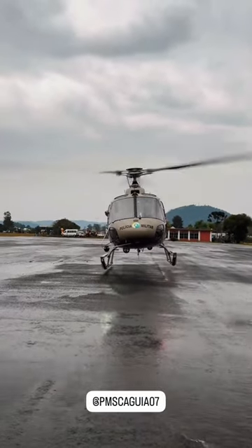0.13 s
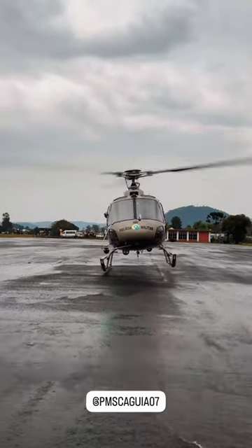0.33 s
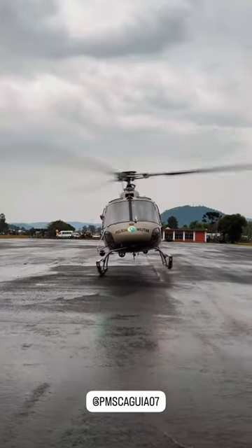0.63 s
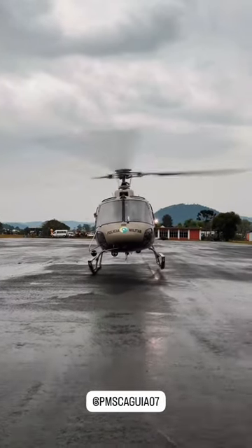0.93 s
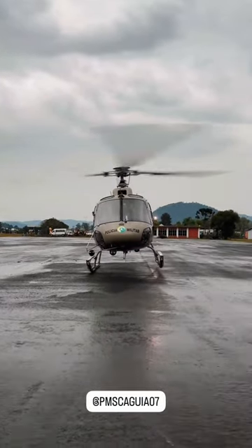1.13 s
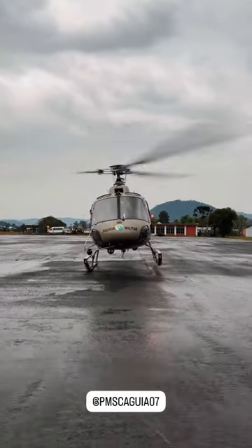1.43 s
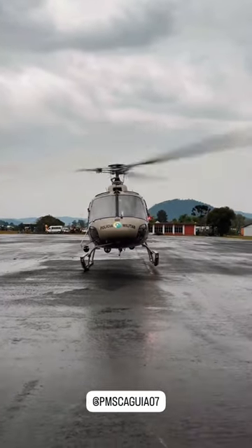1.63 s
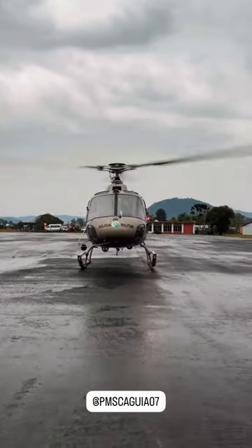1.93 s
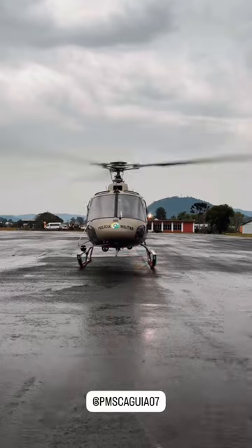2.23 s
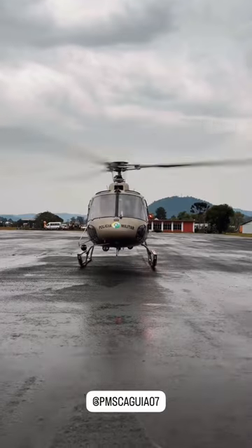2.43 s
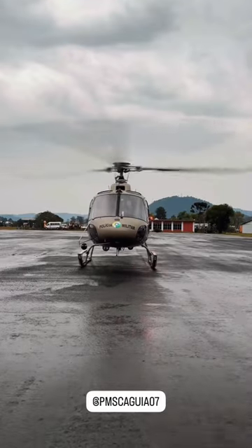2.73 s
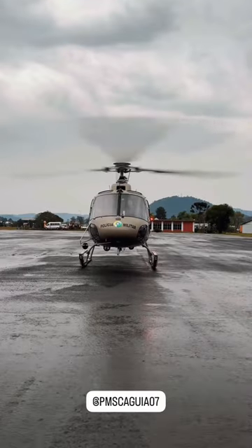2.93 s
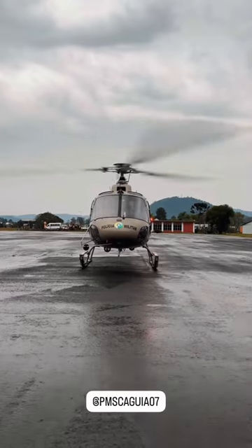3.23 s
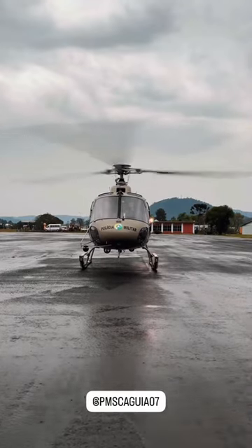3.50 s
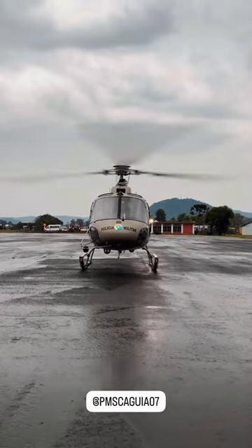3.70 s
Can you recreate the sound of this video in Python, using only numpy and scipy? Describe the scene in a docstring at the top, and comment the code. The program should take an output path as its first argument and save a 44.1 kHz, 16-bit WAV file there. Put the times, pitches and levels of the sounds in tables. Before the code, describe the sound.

Close helicopter settling onto wet tarmac: fast blade slaps, turbine roar and whine, early downwash gusts.

```python
"""Light helicopter landing, heard by a phone.

A light helicopter settles onto wet tarmac, facing a phone with two microphone ports. Main blades slap (gliding
pulses) and swish (noise swelled once a pass); the tail rotor hums (harmonics); the turbine roars and whines
(shaped noise, resonances), with a growl and one hiss. Downwash buffets the ports in gusts and sharp flaps."""
import sys
import numpy as np
from scipy import signal
from scipy.fft import rfft, irfft
from scipy.io import wavfile
from scipy.ndimage import uniform_filter1d, minimum_filter1d

SR = 44100
rng = np.random.default_rng(int(sys.argv[2]) if len(sys.argv) > 2 else 0)


def wav_record(signal):
    """Record a signal, one row per channel, as 16-bit PCM in the file named by sys.argv[1]."""
    frames = np.transpose(np.atleast_2d(signal))
    bounded = np.clip(frames, -1, 1)
    # unit amplitude maps onto the largest positive 16-bit level
    quanta = np.round(bounded * 32767).astype(np.int16)
    wavfile.write(sys.argv[1], SR, quanta)


def ratio(d):
    """dB to gain"""
    e = np.asarray(d, float) / 20
    return 10 ** e


N = 170226
T = np.arange(N) / SR

# Downwash gusts on the ports: start_s, length_s, rush_db, thump_db
GUSTS = [(0, 0.049, -9.5, -9), (0.031, 0.063, -21, -12.5), (0.178, 0.086, -13, -12.5),
         (0.274, 0.068, -17.5, -15), (0.339, 0.066, -15, -12), (0.4, 0.1, -15.5, -9.5),
         (0.485, 0.11, -27.5, -24.5), (0.738, 0.044, -28, -18), (0.827, 0.084, -35, -37),
         (0.92, 0.13, -25.5, -26), (0.996, 0.094, -16.5, -13.5), (1.115, 0.048, -19, -19),
         (1.202, 0.063, -20, -18.5), (1.243, 0.11, -32, -31), (1.453, 0.048, -22.5, -21),
         (1.501, 0.032, -24, -29), (1.672, 0.078, -30, -24.5), (1.819, 0.1, -26.5, -21),
         (1.947, 0.08, -24, -25), (2.095, 0.05, -34, -28), (2.167, 0.084, -46, -22.5),
         (2.259, 0.081, -19.5, -19), (2.35, 0.031, -37, -16), (2.466, 0.097, -31.5, -39),
         (2.739, 0.091, -26, -48), (2.817, 0.037, -23, -20), (2.993, 0.11, -39, -38),
         (3.12, 0.065, -22, -33), (3.171, 0.05, -21.5, -14.5), (3.235, 0.089, -25.5, -50),
         (3.5, 0.13, -37, -29.5), (3.67, 0.078, -29, -36), (3.764, 0.041, -40, -40)]
# Rush spectrum, differs between ports: freq_hz, density_db
RUSH_SPECTRUM = [(60, 0), (150, 1), (400, 0), (800, -2), (1400, -7.5), (2200, -23), (4000, -25),
                 (6500, -88)]
# Thump spectrum, shared by both ports: freq_hz, density_db
THUMP_SPECTRUM = [(20, -45), (33, -19), (50, 5), (70, 0.5), (130, -4), (300, -11), (800, -30.5),
                  (2000, -31), (4000, -59), (6500, -106)]
GUST_EDGE_S, BREEZE_RUSH_DB, BREEZE_THUMP_DB = 0.037, -47, -46.5
RUSH_LUMPY_DB, THUMP_LUMPY_DB, RUSH_LIKENESS = 2.5, 1, -0.6

# Sharp flaps of wind: time_s, level_before_trim_db, centre_hz
FLAPS = [(0.192, -4, 820), (0.196, -7, 1470), (0.218, -20, 1400), (0.227, -7, 1650), (.282, -12, 325),
         (.315, -9.5, 1690), (0.384, -13, 795), (0.419, -8, 804), (.428, -6, 1510), (0.442, -4.5, 1010),
         (1.022, -11.5, 346), (1.062, -5.5, 970), (1.07, -10, 446), (1.675, -14.5, 496), (2.279, -9, 920),
         (2.297, -7.5, 1210), (2.533, -13.5, 430), (2.768, -25, 505), (3.803, -12, 640)]
FLAP_CYCLES, FLAP_TRIM_DB = 1.286, -3.5

# Hiss above the whine; the spread is centre to 1/e
HISS_CENTRE_S, HISS_SPREAD_S, HISS_HZ, HISS_WIDTH_HZ, HISS_DB = 3.03, 0.1, 10050, 630, -36

# Growl: time_s, centre_hz, level_before_roughness_db
GROWL = [(0, 560, -33.5), (.9, 548, -34.5), (1.06, 930, -71), (1.2, 620, -39), (2.2, 547, -37),
         (2.5, 445, -37), (2.8, 560, -42.5), (3.0, 600, -31.5), (3.14, 665, -30.5), (3.3, 596, -34.5),
         (3.55, 465, -42.5), (3.72, 480, -30), (3.86, 430, -29)]
GROWL_WIDTH_HZ, GROWL_ROUGH_DB = 270, 5

# Turbine whine, smeared part: time_s, centre_hz, level_before_trim_db
WHINE_SMEAR = [(0.0, 8340, -44), (0.01, 9000, -66), (0.43, 8740, -36.5), (0.64, 9070, -43),
               (0.79, 8790, -22.5), (0.81, 9000, -34), (1.13, 9000, -36), (1.15, 9000, -26),
               (1.19, 8940, -41), (1.55, 9000, -48), (1.57, 8900, -28), (1.59, 8900, -35.5),
               (1.85, 8980, -35), (1.9, 8700, -19.5), (1.92, 8994, -36), (2.19, 8800, -46),
               (2.22, 8900, -33), (2.27, 8900, -39.5), (2.84, 8880, -35.5), (2.85, 8850, -22),
               (2.87, 8800, -37), (2.95, 8700, -33.5), (3.48, 8380, -36.5), (3.5, 8500, -27),
               (3.53, 8320, -32), (3.86, 8370, -41)]
# Turbine whine, thin tone: time_s, centre_hz, level_db
WHINE_CORE = [(0, 8820, -56), (.6, 8820, -48), (.75, 8820, -43), (1.3, 8815, -51), (1.75, 8815, -44),
              (2.05, 8790, -49), (2.45, 8750, -45), (2.7, 8730, -52), (2.95, 8660, -44), (3.25, 8560, -45),
              (3.5, 8450, -44), (3.65, 8380, -41), (3.86, 8300, -49)]
SMEAR_WIDTH_HZ, CORE_WIDTH_HZ, SMEAR_FLUTTER_DB, SMEAR_TRIM_DB = 300, 16, 4, -4.5

# Tail rotor: time_s, blade_pass_hz, level_db, lift_above_third_order_db
TAIL = [(0, 69, -30, 0), (1.0, 68.75, -49, -5), (1.6, 68.7, -38, 1), (2.1, 68.63, -35, 0),
        (2.4, 68.62, -36, 1), (2.55, 69.2, -32.5, -16), (2.8, 68.54, -24.5, -12), (3.0, 68.94, -26.5, -3),
        (3.15, 68.9, -29.5, -1), (3.3, 68.74, -36.5, 0), (3.45, 68.66, -35.5, 1), (3.6, 68.9, -28.5, -5.5),
        (3.75, 69.4, -34.5, 9.5), (3.86, 69.9, -30.5, 1)]
# Tail rotor harmonics: order, relative_level_db
TAIL_ORDERS = [(1, -9), (2, -10), (3, 0), (4, -6), (5, -16), (6, -12), (7, -15), (8, -11), (9, -12),
               (10, -15), (13, -17), (15, -18), (22, -20), (25, -23)]
TAIL_WAVER_DB = 1.3

# Main rotor: time_s, blade_pass_hz
ROTOR = [(0, 19.42), (2.0, 19.42), (3.86, 19.5)]
FIRST_PASS_S = .0005
# Spectrum of engine and blade turbulence: freq_hz, density_db
ROAR_SPECTRUM = [(30, -15), (60, 6.5), (120, 1), (250, -1), (600, -7), (1200, -9.5), (2500, -14),
                 (3600, -18.5), (5500, -20.5), (6500, -17.5), (7600, -18.5), (10000, -16.5), (10900, -16.5),
                 (11400, -19.5), (13500, -18.5), (15200, -16.5), (15600, -20), (15900, -62)]
# Roar level: time_s, level_before_swell_db
ROAR_LEVEL = [(0, -27.5), (.5, -26.5), (.8, -26), (1.1, -25), (1.5, -27), (2.0, -26.5), (2.5, -27),
              (3.0, -26), (3.4, -27), (3.86, -26.5)]
# Swell of the roar at each blade pass: freq_hz, depth_db
SWISH_DEPTH = [(300, .5), (800, 2.5), (1500, 4), (3000, 5), (5000, 4), (8000, 4), (11000, 5.5), (13500, 7)]
SWISH_RISE_PASSES, SWISH_FALL_PASSES = .1, .33
PATCHY_DB, FLICKER_DB = 2, 1.4

# Main blade slaps: time_s, level_db, centre_hz
SLAPS = [(0.052, -19, 1220), (0.1035, -17.5, 1280), (0.155, -16, 1190), (0.206, -10, 1360),
         (0.2574, -14.5, 1160), (0.3089, -11.5, 1490), (0.3602, -14, 1450), (0.4109, -14, 1160),
         (0.4616, -8.5, 1090), (0.5141, -16.5, 1210), (0.5655, -6, 2050), (0.618, -13.5, 1090),
         (0.6688, -14, 1200), (0.7204, -19.5, 860), (0.771, -19, 1140), (0.821, -20.5, 890),
         (0.876, -14, 1350), (0.9282, -12, 1780), (0.9798, -26, 1480), (1.03, -12, 1340),
         (1.0808, -30, 950), (1.1335, -14.5, 1170), (1.1855, -16.5, 1120), (1.2362, -14, 1260),
         (1.2891, -16, 1180), (1.3405, -13, 1170), (1.3916, -10, 1370), (1.4426, -16.5, 1130),
         (1.493, -14.5, 1230), (1.5458, -11.5, 1070), (1.5971, -15.5, 1000), (1.648, -10.5, 1160),
         (1.6987, -21, 1133), (1.75, -25, 1080), (1.8011, -19.5, 1170), (1.8554, -16.5, 1100),
         (1.906, -16.5, 1050), (1.959, -17, 1210), (2.006, -19, 1790), (2.058, -25, 1020),
         (2.1104, -33, 960), (2.163, -22.5, 1020), (2.216, -16.5, 970), (2.3168, -22, 1070),
         (2.4706, -20, 1040), (2.575, -25, 1290), (2.7286, -25, 1610)]
SLAP_CYCLES, SLAP_GLIDE_PER_CYCLE = 1.3, .24
ECHO_DELAY_S, ECHO_DB, CRACK_DB, CRACK_HZ = .0022, -8, -8, 2500
LEAD_SAMPLES = 55  # slap and flap pulses begin this long before time_s

# Port pair, sound from the front: freq_hz, likeness_0_to_1, right_lead_turns
PORTS = [(100, .9, .02), (600, .8, .07), (1450, .98, .01), (1800, .99, 0), (2300, .55, -.3),
         (3000, .6, -.43), (4000, .25, -.24), (5150, .3, -.13), (5450, 1, -.5), (6050, 1, -.5),
         (6500, .6, -.65), (7200, .45, -.82), (7700, 1, -1), (8600, 1, -1), (9200, .7, -1.15),
         (10300, .25, -1.24), (11400, .4, -1.25), (11800, .93, -1.5), (12200, .93, -1.5),
         (13100, .42, -1.78), (13750, 1, -2), (14950, 1, -2), (15300, .6, -2.12), (15600, .8, -2.05),
         (15700, 1, -2)]
MIC_LOW_HZ, CEILING_DB, LIMIT_HOLD_SAMPLES = 39.6, -1.5, 400


def evened(x):
    """Scales to rms 1."""
    return x / np.sqrt(np.mean(x ** 2) + 1e-20)


def curve(table, column=1, t=T):
    """One table column, joined by straight lines."""
    return np.interp(t, [row[0] for row in table], [row[column] for row in table])


def read(points, hz):
    """Spectrum in dB, interpolated on a log-frequency axis."""
    point_hz, value = np.transpose(points)
    return np.interp(np.log(hz + 1), np.log(point_hz + 1), value)


def wander(corner_hz, channels=1):
    """Random drift of rms 1: low-passed noise."""
    lowpass = signal.butter(2, corner_hz, fs=SR, output="sos")
    return evened(signal.sosfilt(lowpass, rng.standard_normal((channels, N))))


def coloured(points, channels=2):
    """Noise with the given spectrum, rms 1."""
    gain = ratio(read(points, np.fft.rfftfreq(N, 1 / SR)))
    return evened(irfft(rfft(rng.standard_normal((channels, N))) * gain, N))


def resonate(x, hz, width_hz):
    """Unit-gain resonance following hz: shift to 0 Hz, smooth, shift back."""
    turn = np.exp(2j * np.pi * np.cumsum(hz * np.ones(x.shape[-1])) / SR)
    r = np.exp(-np.pi * width_hz / SR)
    return 2 * (turn * signal.lfilter([1 - r], [1, -r], x / turn)).real


def wind():
    """Downwash turbulence at the ports: gusts rise, hold and fall over a light breeze, lumpy throughout."""
    start, length, rush_db, thump_db = np.transpose(GUSTS)[:, :, None]
    t = T[::64]
    since_start = t - start + GUST_EDGE_S / 2
    until_end = start + length + GUST_EDGE_S / 2 - t
    shape = np.clip(np.minimum(since_start, until_end) / GUST_EDGE_S, 0, 1) ** 2

    def envelope(gust_db, breeze_db):
        """Adds gusts and breeze as powers."""
        power = ratio(2 * breeze_db) + (ratio(2 * gust_db) * shape ** 2).sum(0)
        return np.interp(T, t, np.sqrt(power))

    left, other = coloured(RUSH_SPECTRUM) * ratio(RUSH_LUMPY_DB * wander(56, channels=2))
    right = RUSH_LIKENESS * left + np.sqrt(1 - RUSH_LIKENESS ** 2) * other
    rush = envelope(rush_db, BREEZE_RUSH_DB) * np.array([left, right])
    thump = evened(coloured(THUMP_SPECTRUM, channels=1) * ratio(THUMP_LUMPY_DB * wander(24.0)))
    return rush + envelope(thump_db, BREEZE_THUMP_DB) * thump


def flaps():
    """Short flutters of air, alike on both ports: a few cycles under a bell envelope."""
    out, t = np.zeros(N + 1024), np.arange(1024) / SR
    for (time_s, db, hz), phase in zip(FLAPS, rng.standard_normal(len(FLAPS))):
        cycles = t * hz - 2 * FLAP_CYCLES
        pulse = np.exp(-(cycles / FLAP_CYCLES) ** 2) * np.cos(2 * np.pi * cycles + phase)
        out[round(time_s * SR) - LEAD_SAMPLES:][:1024] += ratio(db + FLAP_TRIM_DB) * pulse
    return out[:N]


def hiss():
    """Noise through two fixed resonances, swelling once."""
    band = resonate(rng.standard_normal((2, N)), HISS_HZ, HISS_WIDTH_HZ)
    band = resonate(band, HISS_HZ, HISS_WIDTH_HZ)
    return evened(band) * ratio(HISS_DB) * np.exp(-((T - HISS_CENTRE_S) / HISS_SPREAD_S) ** 2)


def growl():
    """Rough noise in one broad moving resonance, applied twice."""
    hz = curve(GROWL)
    band = resonate(rng.standard_normal((2, N)), hz, GROWL_WIDTH_HZ)
    band = resonate(band, hz, GROWL_WIDTH_HZ)
    return evened(band) * ratio(curve(GROWL, column=2) + GROWL_ROUGH_DB * wander(24.7))


def whine():
    """Compressor tone: a thin core, and a smear chopped by the air the rotor stirs."""
    noise, hz = rng.standard_normal((2, 2, N)), curve(WHINE_SMEAR)
    smear = resonate(noise[0], hz, SMEAR_WIDTH_HZ)
    smear = evened(resonate(smear, hz, 2 * SMEAR_WIDTH_HZ))
    smear_db = curve(WHINE_SMEAR, column=2) + SMEAR_TRIM_DB + SMEAR_FLUTTER_DB * wander(57)
    core = evened(resonate(noise[1], curve(WHINE_CORE), CORE_WIDTH_HZ))
    return ratio(curve(WHINE_CORE, column=2)) * core + ratio(smear_db) * smear


def tail_rotor():
    """Blade-pass harmonics, each wavering by itself; those above the third are lifted together."""
    angle = 2 * np.pi * np.cumsum(curve(TAIL)) / SR
    wavers = ratio(TAIL_WAVER_DB * wander(5.7, channels=len(TAIL_ORDERS)))
    lift = ratio(curve(TAIL, column=3))
    hum = 0
    for (order, db), waver in zip(TAIL_ORDERS, wavers):
        gain = ratio(db) * waver * (lift if order > 3 else 1)
        hum = hum + gain * np.cos(order * angle + 2 * np.pi * rng.random())
    return ratio(curve(TAIL, column=2)) * np.sqrt(2) * hum


def roar():
    """Engine and blade turbulence: wide noise in drifting patches, treble swelling as each blade comes round."""
    hz, t, spectrum = signal.stft(coloured(ROAR_SPECTRUM), SR, nperseg=256, noverlap=192)
    passes = np.interp(t, T, np.cumsum(curve(ROTOR)) / SR)
    phase = (passes - FIRST_PASS_S * ROTOR[0][1]) % 1
    swell = np.exp(-phase / SWISH_FALL_PASSES) + np.exp(-(1 - phase) / SWISH_RISE_PASSES)
    swish_db = read(SWISH_DEPTH, hz)[:, None] * (swell - swell.mean())
    patches = uniform_filter1d(rng.standard_normal((len(t), len(hz))), size=14, axis=0)
    patches = evened(uniform_filter1d(patches, size=2, axis=1)).T
    flicker = np.interp(t, T, wander(28)[0])
    spectrum = spectrum * ratio(swish_db + PATCHY_DB * patches + FLICKER_DB * flicker)
    noise = signal.istft(spectrum, SR, nperseg=256, noverlap=192)[1][:, :N]
    return ratio(curve(ROAR_LEVEL)) * noise


def slaps():
    """A blade cuts the vortex of the one before: a few cycles falling in pitch, a thin crack, a ground echo."""
    out, t = np.zeros((2, N + 512)), np.arange(512) / SR
    chance = rng.standard_normal((len(SLAPS), 3, 2, 1))
    for (time_s, db, slap_hz), (phase, crack_luck, echo_luck) in zip(SLAPS, chance):
        slap = 0
        for delay_s, path_gain in ((0, 1), (ECHO_DELAY_S, ratio(ECHO_DB + 2 * echo_luck))):
            for hz, gain in ((slap_hz, 1), (CRACK_HZ, ratio(CRACK_DB + 2 * crack_luck))):
                cycles = (t - delay_s) * hz - 2 * SLAP_CYCLES
                glided = cycles - SLAP_GLIDE_PER_CYCLE * cycles ** 2 / 2
                pulse = np.exp(-(cycles / SLAP_CYCLES) ** 2) * np.cos(2 * np.pi * glided + phase)
                slap = slap + path_gain * gain * pulse
        out[:, round(time_s * SR) - LEAD_SAMPLES:][:, :512] += ratio(db) * slap
    return out[:, :N]


def ports(direct, scattered):
    """The right port hears a phase-turned copy of the left, mixed with scattered sound."""
    hz = np.fft.rfftfreq(N, 1 / SR)
    likeness = np.clip(curve(PORTS, t=hz), 0, 1)
    turn = np.exp(2j * np.pi * curve(PORTS, column=2, t=hz))
    right = likeness * turn * rfft(direct) + np.sqrt(1 - likeness ** 2) * rfft(scattered)
    return np.array([direct, irfft(right, N)])


def scene():
    """Most of the helicopter through the port pair; tail rotor and wind straight onto the ports."""
    direct, scattered = roar() + growl() + slaps() + whine() + hiss()
    return ports(direct, scattered) + tail_rotor() + wind() + flaps()


def roll_off(x):
    """The treble ends steeply here."""
    return signal.sosfilt(signal.butter(12, 16610, fs=SR, output="sos"), x)


def record(dry):
    """The microphone drops the deepest bass; a limiter eases the highest peaks."""
    highpass = signal.butter(3, MIC_LOW_HZ, "high", fs=SR, output="sos")
    heard = signal.sosfilt(highpass, dry)
    room = np.minimum(ratio(CEILING_DB) / (abs(heard).max(0) + 1e-9), 1)
    held = minimum_filter1d(room, size=LIMIT_HOLD_SAMPLES)
    gain = uniform_filter1d(held, size=LIMIT_HOLD_SAMPLES)
    return roll_off(heard * gain)


dry = scene()
out = record(dry)
wav_record(out)
```